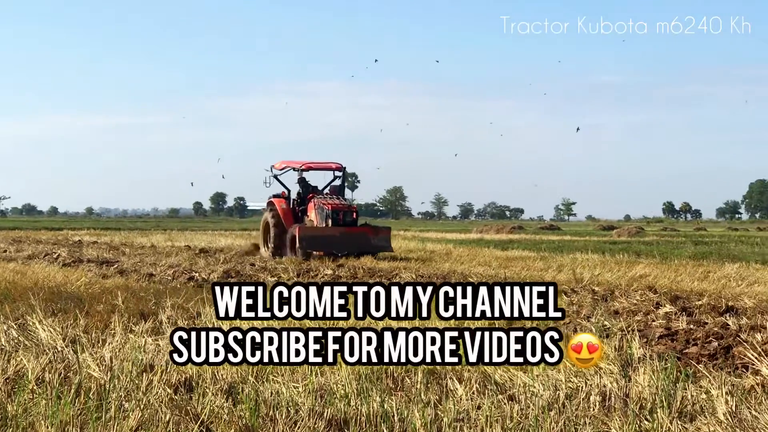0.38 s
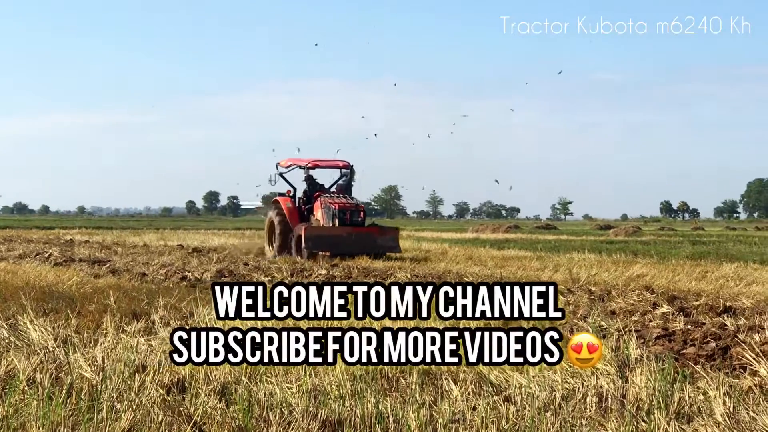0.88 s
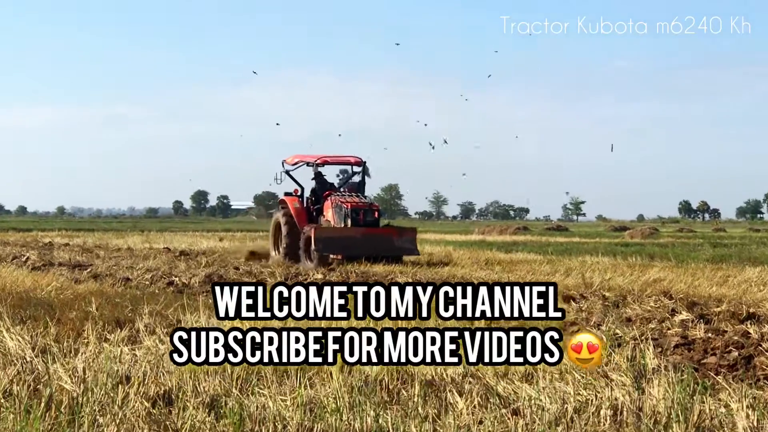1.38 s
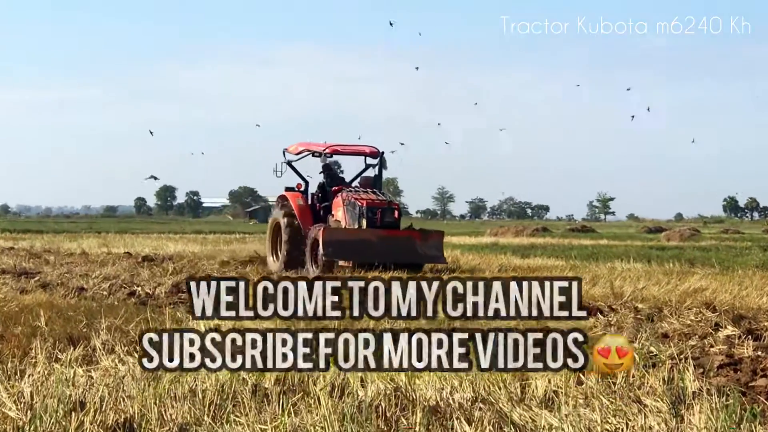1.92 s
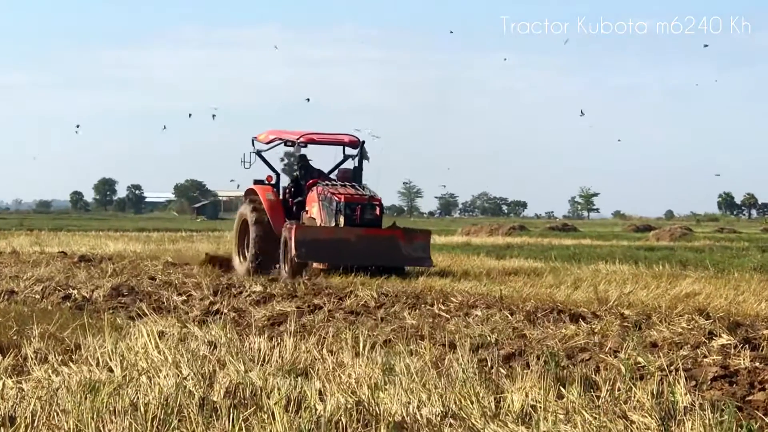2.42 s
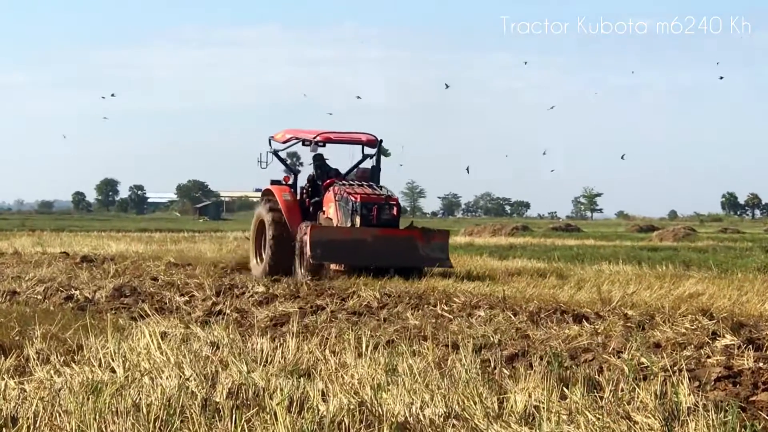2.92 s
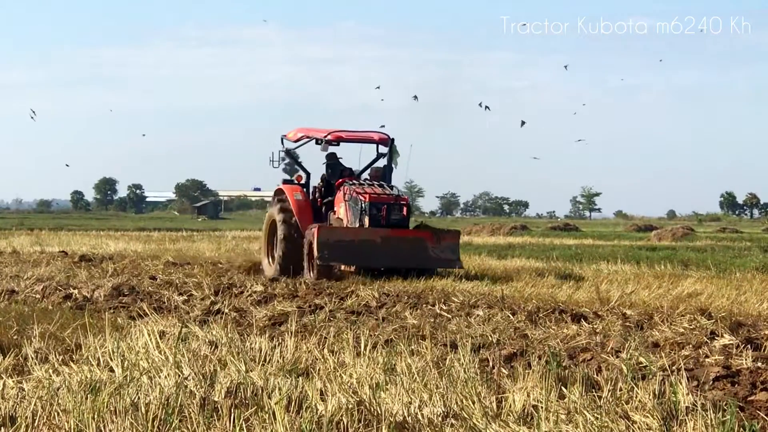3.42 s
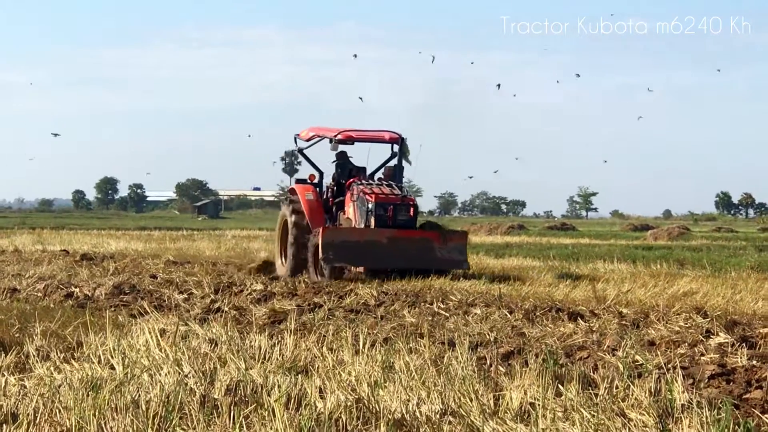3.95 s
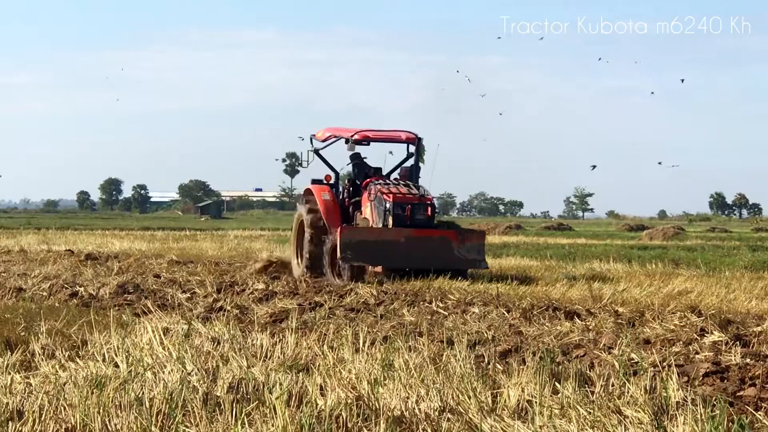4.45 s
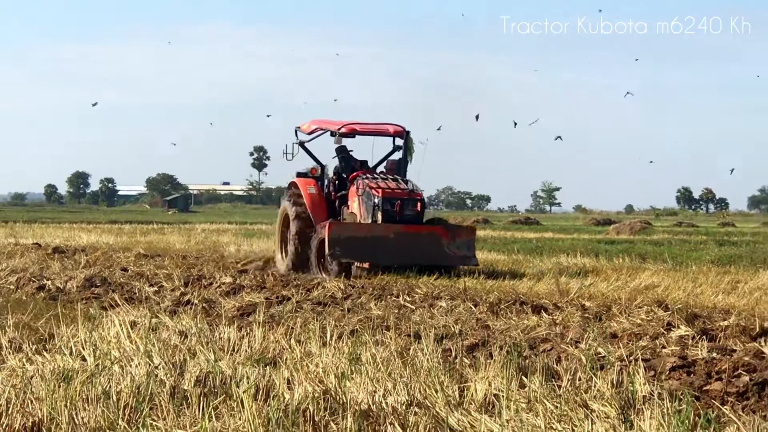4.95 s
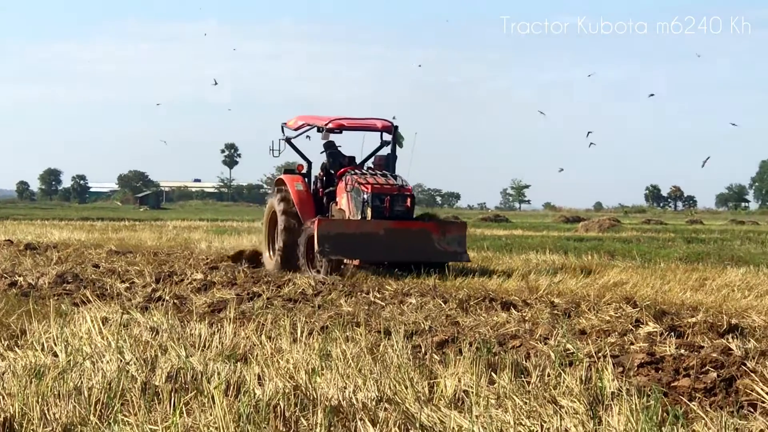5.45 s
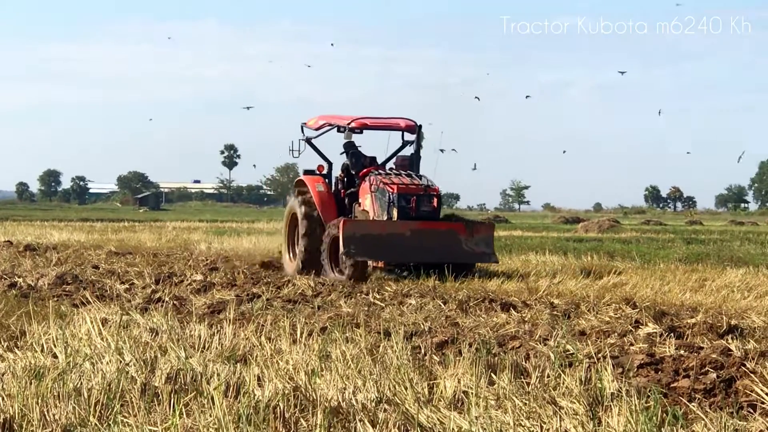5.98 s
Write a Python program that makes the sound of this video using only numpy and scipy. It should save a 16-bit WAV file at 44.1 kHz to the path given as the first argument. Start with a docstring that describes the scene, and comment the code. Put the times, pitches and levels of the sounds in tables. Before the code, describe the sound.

Outdoors, with no room echo, a tractor engine runs continuously under load. A low two-note hum sits beneath dense diesel clatter, about seventy knocks a second blending into a rough purr. Crisp valve ticks swell midway and recede; the pitch lifts a little, then dips late and begins recovering. Weak gear whine wavers behind. Small bumps of low wind noise strike the microphone, with a soft constant hiss.

```python
"""The exhaust of a four-cylinder diesel tractor hums on the firing rate and its octave, as two swaying sines.
Every firing also knocks the block and ticks in the valve gear: noise gated by the firing cycle and coloured
part by part, brightest for a while in the middle. A drone, weak shaft tones and gear whine fill in behind.
The tractor pulls through a stubble field towards a small camera microphone; a light wind buffets its port
as gusty low noise, over a steady faint hiss."""
import sys
import numpy as np
from scipy import signal
from scipy.fft import rfft, irfft, next_fast_len
from scipy.io import wavfile
from scipy.ndimage import uniform_filter1d, map_coordinates

SR = 44100
rng = np.random.default_rng(int(sys.argv[2]) if len(sys.argv) > 2 else 0)


def field_ratio(decibels):
    """Amplitude ratio for a level in dB (20 dB per decade); scalars and array-likes work."""
    return 10 ** (np.asarray(decibels, dtype=float) / 20)


def waveform_to_disk(signal):
    """Save audio, clipped to [-1, 1], as 16-bit WAV at the path in sys.argv[1]."""
    frames = np.transpose(np.atleast_2d(signal))
    scaled = np.clip(frames, -1, 1) * 32767
    samples = np.round(scaled).astype(np.int16)
    wavfile.write(sys.argv[1], SR, samples)


N = 269010

# Engine speed, sagging and recovering with the load: (time [s], rate [firings/s])
FIRING_RATE = [(0.0, 71.12), (0.34, 71.4), (0.68, 71.13), (1.02, 71.24), (1.36, 72.3), (1.69, 72.58),
               (2.03, 72.97), (2.37, 72.39), (2.71, 73.15), (3.05, 73.57), (3.39, 73.67), (3.73, 72.85),
               (4.07, 72.43), (4.41, 72.78), (4.74, 72.16), (5.08, 71.73), (5.42, 70.3), (5.76, 70.37),
               (6.1, 70.96)]
# Weak tones from uneven cylinders, fan and gears:
# (multiple of firing rate [ratio], level over the drone [dB], phase wander [turns])
SHAFT_TONES = [(3, -10.5, 0.13), (4.25, -17.5, .06), (4.75, -9, .035), (5, -14.5, 0), (5.25, -11.5, 0),
               (5.5, -16.5, .04), (5.75, -14.5, 0.05), (6, -11, 0.06), (6.25, -9, 0.11),
               (7.75, -13.5, 0.15), (9, -8.5, 0.13)]
# Level curves whose swings the engine parts follow:
# (time [s], block knock [dB], head ring [dB], valve ticks [dB], highest ticks [dB])
CLATTER_LEVELS = [(0, -44, -48, -47, -54), (.3, -43.5, -47, -48.5, -55), (.5, -43.5, -47, -47, -60),
                  (.85, -44.5, -47.5, -46, -56), (1.27, -41.5, -46.5, -42, -55.5),
                  (1.55, -41.5, -47, -46, -55.5), (1.95, -40.5, -48, -44, -59),
                  (2.33, -40, -43.5, -42, -49.5), (2.57, -38.5, -41, -42.5, -49.5),
                  (2.7, -40, -42, -38, -46), (3.07, -40, -40.5, -35.5, -42.5),
                  (3.5, -39.5, -38.5, -32, -40.5), (4, -38.5, -39, -36.5, -49), (4.2, -36.5, -42, -45, -52),
                  (4.74, -38, -45.5, -48, -59), (4.85, -37.5, -44, -43, -56),
                  (5.3, -41.5, -43.5, -49, -61.5), (5.48, -39.5, -43, -48.5, -61.5),
                  (5.8, -39.5, -41.5, -46, -53.5), (6.1, -40, -40, -43, -50)]
# Resting points of those four curves: (block [dB], head [dB], valves [dB], highest ticks [dB])
CLATTER_REST = (-41, -44, -45, -54)
# How each part follows the swings and the approach: name: (usual level [dB],
# share of block, head, valve and highest-tick swing [ratio, four columns], gain over time [dB/s])
PART_LEVELS = {"fundamental": (-34.5, 0.49, -0.03, .05, 0.09, -0.1),
               "octave": (-38.5, 0.42, -0.11, 0.16, -0.0152, 0.24),
               "drone": (-51, 0.5, .01, .01, -0.0043, 0.17), "block": (-41, 1, 0, 0, 0, 0),
               "head": (-43, 0, 1, 0, 0, 0), "cover": (-51, 0.92, 0.62, -0.03, 0.13, -0.73),
               "valves": (-44.5, 0, 0, 1, 0, 0), "injectors": (-52, 0, 0, 0, 1, 0),
               "air": (-69.5, -0.5, 0.53, -0.16, 0.75, 1.5),
               "second gear": (-56, -0.6, -0.2, -0.18, 0.09, 1)}
# Strength of the four cylinders' firings: (one level [dB] per cylinder)
CYLINDER_DB = [-1.8, -1.6, 0.59, -2.6]
# The hardest firings: (time [s], strength in place of the cylinder's own [dB])
HARD_FIRINGS = [(.73, 4), (1.053, 5), (1.304, 4.5), (2.749, 4.5), (3.361, 3), (3.51, 5), (3.648, 5),
                (3.977, 4.5), (4.597, 5.5), (4.61, 5)]
# Whine at 13.5 times the firing rate: (time [s], level [dB])
WHINE_LEVEL = [(0, -59), (.9, -53.5), (1.4, -46), (2.2, -47.5), (3.3, -50), (4.2, -56), (5, -47.5),
               (5.6, -53), (6.1, -44)]

# Spectral colours, relative density: (frequency [Hz], density [dB per Hz])
DRONE_COLOUR = [(140, -24), (230, -4), (280, -6), (424, -1.5), (514, -4.5), (796, -3), (850, -6),
                (1100, -23), (1870, -120)]
BLOCK_COLOUR = [(600, -42), (820, -20), (860, -2), (920, -4), (979, 2.5), (1025, -2.5), (1072, 2),
                (1120, -0.5), (1200, -1), (1400, -4.5), (1530, -9), (1700, -5.5), (1800, -5.5),
                (1960, -14.5), (2150, -13.5), (2600, -53), (4000, -59.5)]
HEAD_COLOUR = [(1900, -30), (2600, -12), (2850, -7.5), (3190, 2.5), (3450, 0), (3700, 1), (3960, -9.5),
               (4260, -5), (4700, -9.5), (5100, -14.5), (6000, -17), (9000, -56)]
COVER_COLOUR = [(1700, -39), (2150, -10.5), (2300, -5), (2400, 0.5), (2520, -6), (2700, -11), (3300, -44),
                (5000, -72)]
VALVE_COLOUR = [(4000, -32), (5150, -13.5), (5400, -8.5), (5700, -2), (6150, 1), (6600, -4.5), (7200, -5.5),
                (7550, -19.5), (8500, -45), (12000, -75)]
INJECTOR_COLOUR = [(6500, -11.5), (7600, -1), (7900, 1.5), (8400, 3.5), (8750, -2.5), (9150, -7),
                   (9700, -9.5), (10300, -21.5), (11500, -35), (16000, -76)]
AIR_COLOUR = [(6060, -26), (10300, -4.5), (11400, -2.5), (13900, -12), (15100, -15), (15800, -9)]
HISS_COLOUR = [(6060, -28), (10300, -19), (10700, -4), (14700, 5), (15800, -2)]
WIND_COLOUR = [(18, -41.5), (30, -20), (45, 7.5), (90, 3.5), (180, -3.5), (250, -15.5), (400, -35.5),
               (900, -78)]

# Dull band from the ground echo, sliding down as the tractor comes on:
# (time [s], centre [Hz], depth [dB])
ECHO_DIP = [(4, 10600, 0), (4.5, 9400, 5), (4.9, 8400, 4), (5.4, 7360, 4), (5.8, 7500, 0)]
# The echo also lifts a band below: centre and height as shares of the dip's, and width in Hz
LIFT_RATIO, LIFT_SHARE, LIFT_WIDTH_HZ = 0.77, 0.43, 210

# Gusts on the port, added to the breeze: (time [s], peak level [dB], half length [s])
GUST_TIMES = [(.26, -37, 0.046), (0.62, -34, .07), (0.877, -30.5, 0.075), (1.05, -32, 0.041),
              (1.29, -44, 0.072), (1.66, -40, 0.055), (2.05, -38, 0.11), (2.41, -34.5, 0.12),
              (2.89, -36, .07), (3.154, -38, .07), (3.418, -36, .05), (3.936, -32, 0.026),
              (4.786, -41, .09), (5.325, -39, 0.034), (5.5, -35.5, 0.031), (5.632, -39.5, 0.053),
              (6.08, -37, 0.1)]
BREEZE_DB, SWAY_DB = -43.5, 1.8  # level between gusts, and its slow sway

BAND_LIMIT_HZ = 15780


def unit(x):
    """Scales a signal to rms 1."""
    return x / np.sqrt(np.mean(x ** 2) + 1e-20)


def curves(rows):
    """Draws one value per sample for each column after the time."""
    times, *columns = np.transpose(rows)
    return [np.interp(np.arange(N) / SR, times, column) for column in columns]


def wobble(rate):
    """Smooth random curve with rate knots a second."""
    knots = rng.standard_normal(int(N * rate / SR) + 4)
    return map_coordinates(knots, [np.arange(N) * rate / SR])


def coloured(x, spectrum):
    """Filters x causally to a spectral colour, at rms 1."""
    size = 8192
    hz, db = np.transpose(spectrum)
    bin_hz = np.fft.rfftfreq(size, 1 / SR)
    level = np.interp(np.log(bin_hz + 1), np.log(hz + 1), db)
    # Folding the cepstrum forward in time gives minimum phase
    cepstrum = irfft(np.log(field_ratio(np.maximum(level, -70))))
    cepstrum[1:size // 2] *= 2
    cepstrum[size // 2 + 1:] = 0
    impulse = irfft(np.exp(rfft(cepstrum)))
    return unit(signal.fftconvolve(x, impulse)[:N])


def level_db(part):
    """Level of one engine part through time: its usual level, the shared swings and the approach."""
    usual_db, *shares, db_per_s = PART_LEVELS[part]
    swings = np.array(curves(CLATTER_LEVELS)) - np.c_[list(CLATTER_REST)]
    return usual_db + np.dot(shares, swings) + db_per_s * np.arange(N) / SR


def firings():
    """Running count of firings: whole numbers mark the crest of the exhaust octave."""
    return 0.115 + np.cumsum(curves(FIRING_RATE)[0]) / SR


def strokes():
    """Place of each sample around its firing [cycles], and that firing's strength [dB]."""
    count = firings() - 0.08 + 0.5
    which = count.astype(int)
    chance = rng.standard_normal((which[-1] + 1, 2))
    cylinder = np.arange(len(chance)) % len(CYLINDER_DB)
    strength = np.take(CYLINDER_DB, cylinder) + 0.18 * chance[:, 0]
    for s, db in HARD_FIRINGS:
        strength[which[round(s * SR)]] = db
    place = count % 1 - 0.5 - 0.041 * chance[which, 1]  # each blow lands a little early or late
    return place, strength[which]


def rattle(repeat):
    """Noise of which a share returns each engine cycle, as the same parts meet in the same order."""
    size = 2450  # noise values per engine cycle
    turn = firings() / len(CYLINDER_DB) % 1
    cycle = rng.standard_normal(size)[(turn * size).astype(int)]
    share = np.clip(repeat, 0, 1)
    return np.sqrt(share) * cycle + np.sqrt(1 - share) * rng.standard_normal(N)


def burst(stroke, rise, fall, between_db, own_db, repeat):
    """Rattle that flares at each firing (rise and fall in cycles) and goes on in between."""
    place, strength = stroke
    swell = np.exp(-(place / rise) ** 2)
    decay = np.exp(-np.abs(place) / fall)
    flare = np.where(place < 0, swell, decay)
    gate = field_ratio(strength + own_db * wobble(60)) * flare
    gate += field_ratio(between_db + 0.47 * wobble(40))
    return gate * rattle(repeat)


def shaft_tone(order, db, wander, flutter_db=2.5):
    """Sine on a multiple of the firing rate, blurred by quick slips of phase and level."""
    drift = rng.uniform() + wander * wobble(24)  # turns
    return field_ratio(db + flutter_db * wobble(14)) * np.cos(2 * np.pi * (order * firings() + drift))


def dappled(x, quick_db, width_hz):
    """Panels ring a little differently each blow; the ground echo cancels one band and lifts another."""
    hz, t, z = signal.stft(x, SR, nperseg=256)
    patches = uniform_filter1d(rng.standard_normal(z.shape), size=2, axis=0)
    patches = unit(uniform_filter1d(patches, size=6, axis=1))
    times, centres, depths = np.transpose(ECHO_DIP)
    centre_hz = np.interp(t, times, centres)
    depth_db = np.interp(t, times, depths)
    dip_shape = np.exp(-((hz[:, None] - centre_hz) / width_hz) ** 2)
    lift_shape = np.exp(-((hz[:, None] - LIFT_RATIO * centre_hz) / LIFT_WIDTH_HZ) ** 2)
    cut_db = depth_db * (dip_shape - LIFT_SHARE * lift_shape)
    z = z * unit(field_ratio(quick_db * patches)) * field_ratio(-cut_db)
    return signal.istft(z, nperseg=256)[1][:N]


def hiss():
    """Steady hiss of stubble and microphone: coloured noise."""
    return field_ratio(-71.0) * coloured(rng.standard_normal(N), HISS_COLOUR)


def wind():
    """Lumpy low buffeting at the port: a breeze with bell-shaped gusts adding their power."""
    t = np.arange(N) / SR
    power = field_ratio(BREEZE_DB + SWAY_DB * wobble(3.89)) ** 2
    for s, peak_db, half_s in GUST_TIMES:
        power += field_ratio(peak_db) ** 2 * np.exp(-((t - s) / half_s) ** 2)
    lumpy = field_ratio(1.36 * wobble(30)) * rng.standard_normal(N)
    return np.sqrt(power) * coloured(lumpy, WIND_COLOUR)


def gear_whine():
    """Two gears whine on high multiples of the firing rate."""
    whine = shaft_tone(13.5, curves(WHINE_LEVEL)[0], wander=0.115, flutter_db=2.1)
    whine += shaft_tone(15, level_db("second gear"), wander=0.14)
    return np.sqrt(2) * whine  # levels are rms


def drone(stroke):
    """Low body noise pulsing with each firing, with weak shaft tones levelled against it."""
    body = coloured(burst(stroke, 0.16, 0.22, 2.1, 3.8, repeat=0.094), DRONE_COLOUR)
    comb = np.sqrt(2) * sum(shaft_tone(*row) for row in SHAFT_TONES)
    return field_ratio(level_db("drone")) * (body + comb)


def clatter(stroke):
    """One blow per firing rings block, head, covers and valve gear, each with its own flare and colour."""
    block = coloured(burst(stroke, 0.13, 0.19, 1.0, 0.97, repeat=0.12), BLOCK_COLOUR)
    head = coloured(burst(stroke, 0.14, 0.093, 0.27, 1.0, repeat=0.15), HEAD_COLOUR)
    cover = coloured(burst(stroke, 0.33, 0.15, -3.2, 1.2, repeat=0.14), COVER_COLOUR)
    valves = coloured(burst(stroke, 0.1, 0.14, -12, 1.1, repeat=0.1), VALVE_COLOUR)
    injectors = coloured(burst(stroke, 0.18, 0.085, -8, 1.7, repeat=0.2), INJECTOR_COLOUR)
    air = coloured(burst(stroke, 0.048, 0.1, -0.98, 1.1, repeat=0), AIR_COLOUR)
    metal = field_ratio(level_db("block")) * block
    metal += field_ratio(level_db("head")) * head
    metal += field_ratio(level_db("cover")) * cover
    metal += field_ratio(level_db("valves")) * valves
    metal += field_ratio(level_db("injectors")) * injectors
    metal += field_ratio(level_db("air")) * air
    return dappled(metal, quick_db=1.5, width_hz=440)


def exhaust():
    """Exhaust pulses heard as two strong clean sines: the firing rate and its octave."""
    count = firings()
    fundamental_db = level_db("fundamental") + 0.28 * wobble(8)
    octave_db = level_db("octave") + 0.22 * wobble(8.7)
    hum = field_ratio(fundamental_db) * np.cos(2 * np.pi * (count - 0.34))
    hum += field_ratio(octave_db) * np.cos(4 * np.pi * count)
    return np.sqrt(2) * hum  # levels are rms


def scene():
    """Everything at one microphone; drone and clatter share the same firings."""
    stroke = strokes()
    engine = gear_whine() + drone(stroke) + clatter(stroke) + exhaust()
    return (hiss() + wind() + engine)[None]


def roll_off(x):
    """The treble ends steeply here."""
    return signal.sosfilt(signal.butter(12, 16840, fs=SR, output="sos"), x)


def record(dry):
    """The camera keeps nothing above its band limit."""
    size = next_fast_len(N)
    passed = np.fft.rfftfreq(size, 1 / SR) < BAND_LIMIT_HZ
    kept = irfft(rfft(dry, size) * passed, size)[:, :N]
    return roll_off(kept)


dry = scene()
out = record(dry)
waveform_to_disk(out)
```